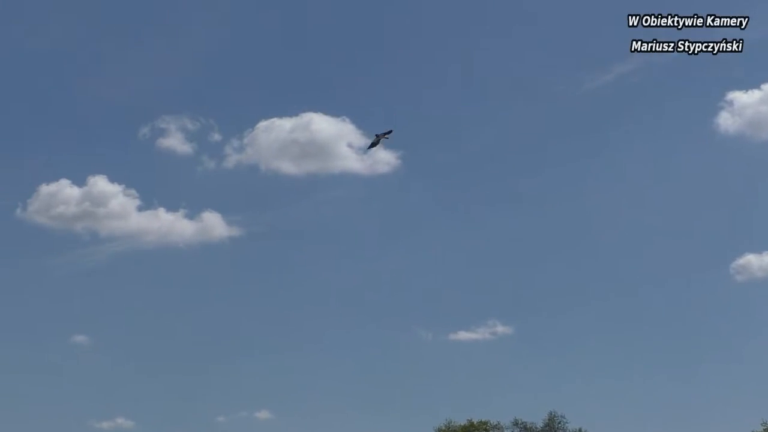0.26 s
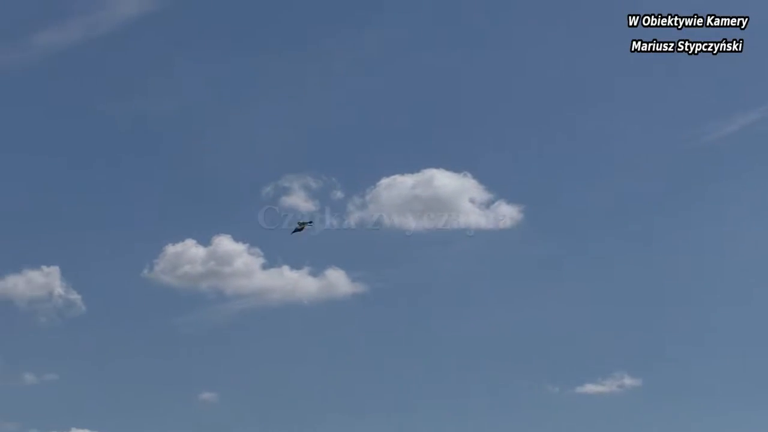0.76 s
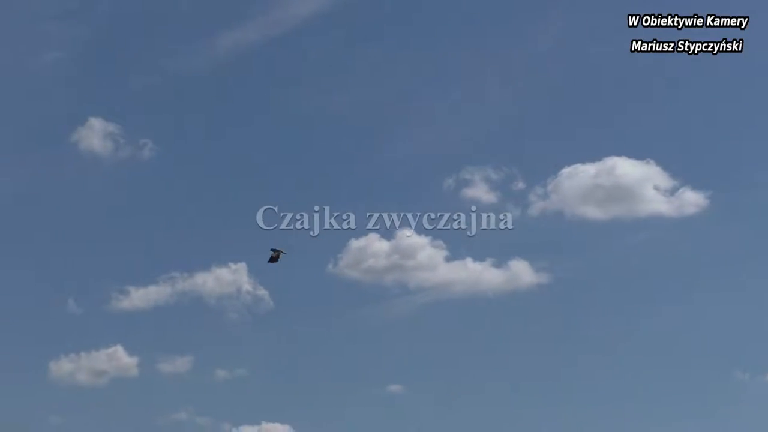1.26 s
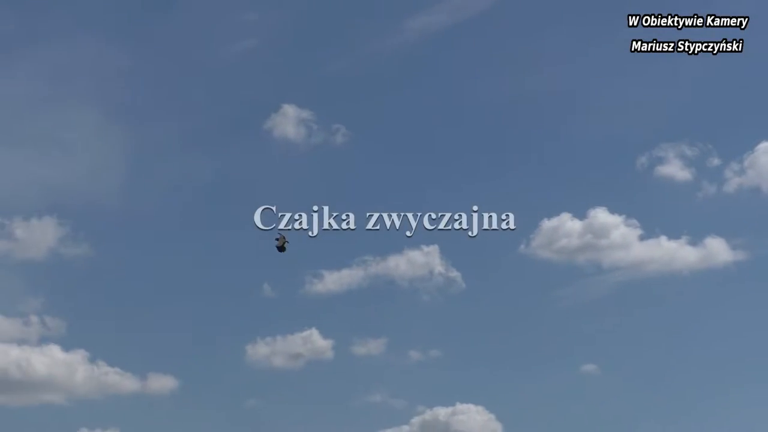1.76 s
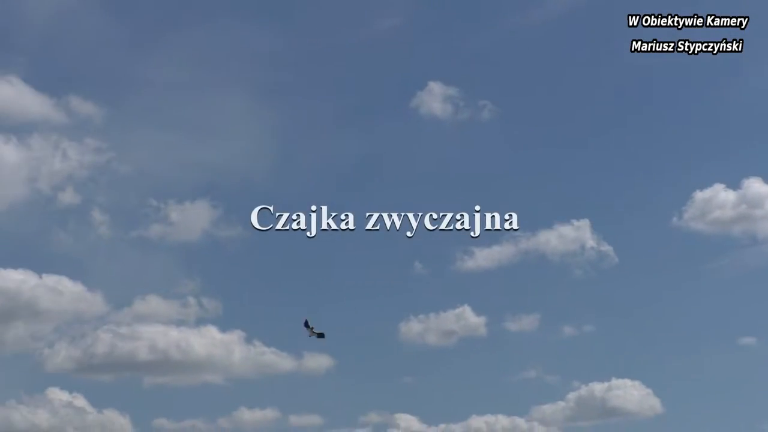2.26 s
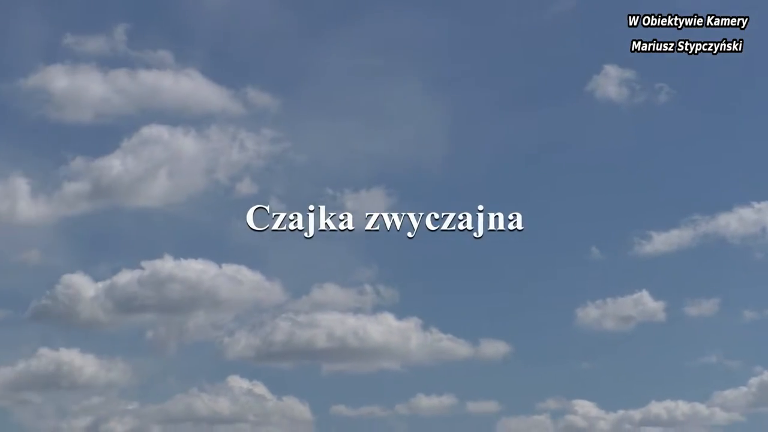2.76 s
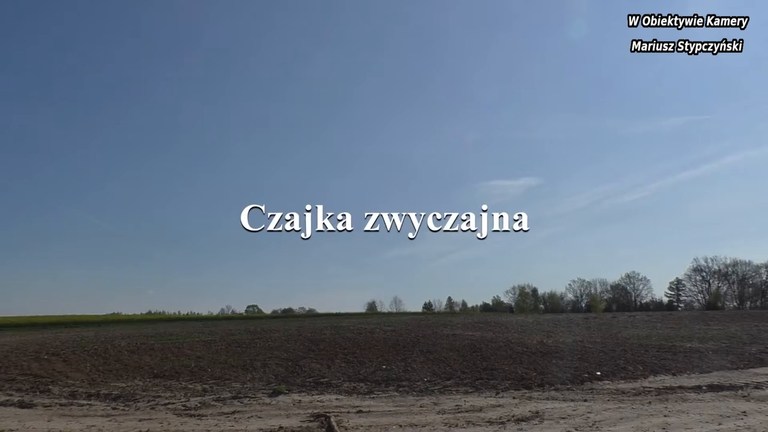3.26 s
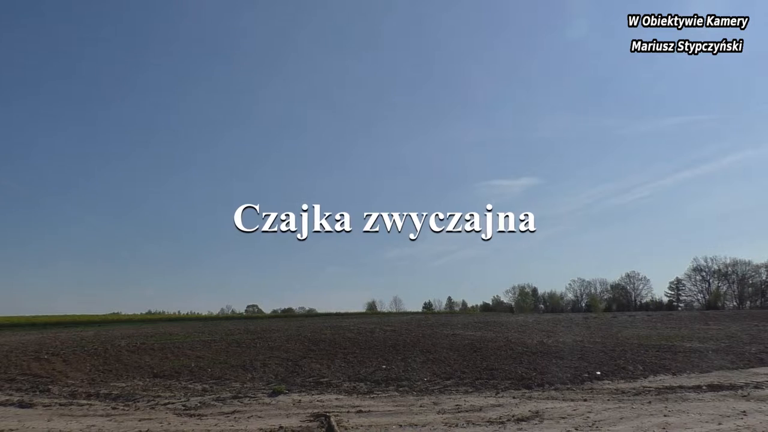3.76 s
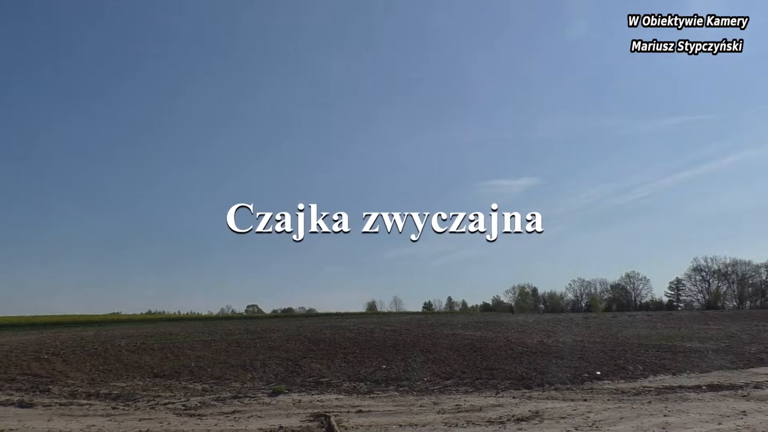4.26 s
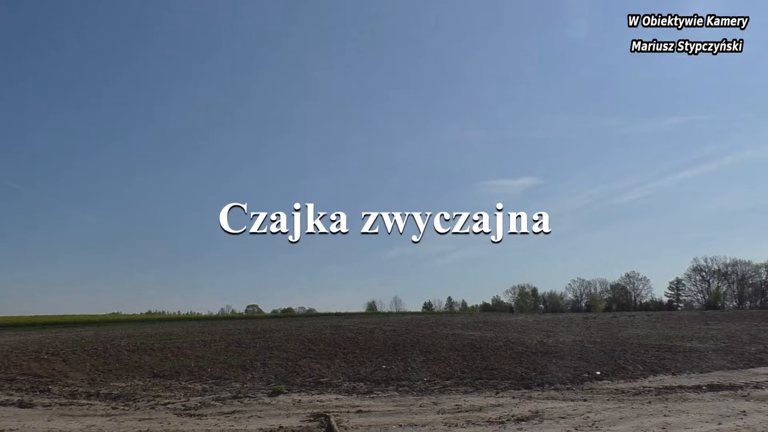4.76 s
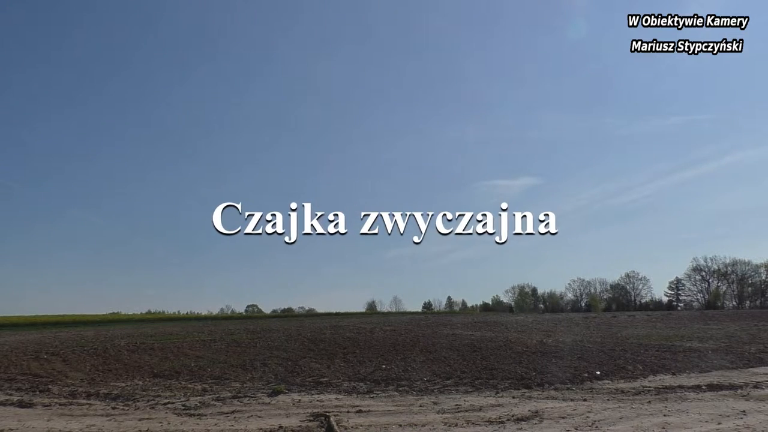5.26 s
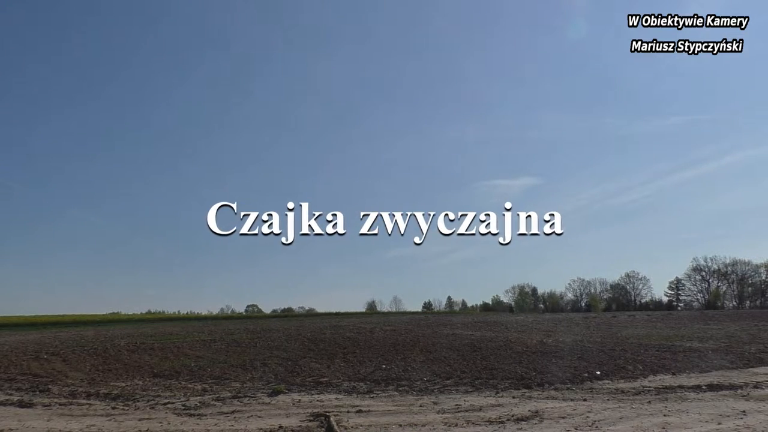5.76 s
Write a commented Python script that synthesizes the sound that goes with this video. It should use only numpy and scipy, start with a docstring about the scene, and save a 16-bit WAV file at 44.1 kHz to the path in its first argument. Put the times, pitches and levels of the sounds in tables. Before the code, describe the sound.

Outdoors over farmland, a hand-held camera microphone catches a reedy lapwing: a rising whine, two quick yelps with rasping mutters, then a hoarse dip sweeping up to a squeal. Distant thin whistles and a quick high trill come behind. After a gap, two nasal arched cries rise, crack slightly and fall. Soft crop hiss swells later; low wind thumps and a few finger knocks intrude.

```python
"""A lapwing opens with a reedy rising call over breezy fields, then yelps, mutters and slides hoarsely.
Far whistles glide in from 0.6 s and a trill turns five times at 2.7 s; arched calls follow at 3.8 and 5.5 s.
The calls are stacks of partials shaped by a throat, with rough spells and breath noise, and leave a faint echo.
Filtered noise buffets the ports in gusts and hisses in the crops, swelling after 4 s.
Now and then fingers tick and knock on the hand-held camera: short scrapes that ring its body modes."""
import sys
import numpy as np
from scipy import signal
from scipy.fft import rfft, irfft
from scipy.io import wavfile
from scipy.ndimage import uniform_filter1d, map_coordinates

SR = 44100
rng = np.random.default_rng(int(sys.argv[2]) if len(sys.argv) > 2 else 0)


def store_pcm(level_fs):
    """Save levels as 16-bit WAV."""
    pcm = np.round(np.clip(level_fs, -1, 1) * 32767).astype(np.int16)
    wavfile.write(sys.argv[1], SR, np.atleast_2d(pcm).T)


N = 265482
T = np.arange(N) / SR
TOP_HZ = 15850  # top of the camera's band


def undb(db):
    """Gain of a level in dB."""
    return 10 ** (np.asarray(db, float) / 20)


def curve(rows):
    """Automation lanes: the columns of (time_s, value, ..) rows drawn at every sample."""
    time_s, *columns = np.transpose(rows)
    return [np.interp(T, time_s, column) for column in columns]


def tilt(points, hz):
    """Level in dB at hz, read from (hz, db) points on a log frequency axis."""
    point_hz, db = np.transpose(points)
    return np.interp(np.log(np.maximum(hz, 1)), np.log(point_hz), db)


def walk(rate, count=N):
    """Smooth random wander of spread 1; a higher rate in Hz wanders faster."""
    width = max(int(SR / rate), 2)
    wander = uniform_filter1d(rng.standard_normal(count), width)
    wander = uniform_filter1d(wander, width)
    return wander / wander.std()


def pan(x, db):
    """Place a sound between the channels; db is left minus right."""
    return x * undb(np.array([db, -db]) / 2).reshape(2, -1)


def swells(rows, rise, fall):
    """Sum of (start_s, end_s, height) plateaus with sloped ends in s; fall may differ per row."""
    total = 0
    for (start, end, height), fall_s in zip(rows, np.broadcast_to(fall, len(rows))):
        slopes = np.minimum((T - start) / rise, (end - T) / fall_s)
        total = total + height * np.clip(slopes, 0, 1)
    return total


def gate(spans, edge_s):
    """1 inside the (start_s, end_s) spans, with soft edges."""
    is_on = sum(1. * (T >= start) * (T < end) for start, end in spans)
    return uniform_filter1d(is_on, int(edge_s * SR), mode="nearest")


def breathy(points):
    """Mono noise with the spectrum of (hz, db) points, rms 1."""
    hz = np.fft.rfftfreq(N, 1 / SR)
    inside = (hz > points[0][0]) * (hz < points[-1][0])
    noise = irfft(rfft(rng.standard_normal(N)) * undb(tilt(points, hz)) * inside, N)
    return noise / noise.std()


def air(points, alike, lo_hz, hi_hz, flicker_db, rate):
    """Stereo noise, rms 1 from lo to hi before each octave flickers by itself; alike 1 is mono, 0 unrelated."""
    hz, out = np.fft.rfftfreq(N, 1 / SR), 0
    mid, side = rfft(rng.standard_normal((2, N))) * undb(tilt(points, hz)) * (hz > points[0][0])
    pair = np.sqrt(1 + alike) * mid + np.sqrt(1 - alike) * side * np.array([[1], [-1]])
    in_band = (hz > lo_hz) & (hz < hi_hz)
    pair = pair * N / np.sqrt(2 * (1 + alike) * np.sum(np.abs(mid[in_band]) ** 2))
    for octave in range(int(np.log2(points[0][0])), int(np.log2(points[-1][0])) + 2):
        share = np.clip(1 - np.abs(np.log2(hz + 1) - octave), 0, 1)  # triangular octave bands
        out = out + irfft(pair * share, N) * undb(flicker_db * walk(rate))
    return out


def far_drone():
    """A far drone: a narrow, nearly mono noise band around one pitch, steady until 3.1 s and much fainter
    after."""
    # drone level: time_s, level_db
    drone_level = [(3.1, -73.5), (3.2, -82)]
    centre_hz, reach_hz = 756, 132
    skirt = [(centre_hz - reach_hz, -20), (centre_hz, 0), (centre_hz + reach_hz, -40)]
    return undb(curve(drone_level)[0]) * air(skirt, 0.99, 500, 1000, 1.0, 0.47)


def microphone_hiss():
    """Microphone self-noise: steady mono hiss at the top of the band."""
    # hiss spectrum: freq_hz, density_db (per Hz)
    hiss = [(5000, -39), (8500, -4), (11000, 4.5), (14000, 2), (16000, 3.5)]
    return undb(-82) * air(hiss, 1.0, 14550, 15110, 0.56, 4.1)


def crops():
    """The breeze rubs through the crops: broad hiss, partly shared by both channels."""
    # crop spectrum: freq_hz, density_db (per Hz)
    crop_spectrum = [(400, 1.5), (600, -6), (1000, 3), (1500, 3), (2800, 0), (3800, -4.5), (5000, -11.5),
                     (8000, -12), (12000, -27.5)]
    # breeze in the crops: time_s, level_db
    breeze = [(0, -64), (3.1, -65), (4.2, -58), (4.3, -54), (4.4, -60), (4.62, -59.5), (4.72, -56),
              (5.04, -58.5), (5.12, -68.5), (6.0, -68.5)]
    return undb(curve(breeze)[0]) * air(crop_spectrum, 0.61, 580, 7900, 1.5, 6.6)


def wind():
    """Turbulence at the ports: gusty buffeting unrelated left to right, low rumble and single puffs."""
    # gusts on the ports: start_s, length_s, level_db
    gust_rows = [(1.79, 0.36, -58), (3.122, 0.46, -60), (3.629, 0.24, -61), (3.905, 0.5, -68.5),
                 (4.245, 0.18, -66), (4.531, 0.3, -60), (4.809, 0.19, -56.5), (5.213, 0.87, -57)]
    # buffeting spectrum: freq_hz, density_db (per Hz)
    buffet = [(25, -4.5), (97, 2.5), (172, -4.5), (309, -15), (600, -38)]
    # steady far rumble: freq_hz, density_db (per Hz)
    rumble = [(25, -3.5), (150, 0), (350, -3), (600, -17.5)]
    # puffs that swing the diaphragm once: start_s, level_db, swing_hz
    puffs = [(1.901, -41, 95), (1.942, -43, 102), (1.963, -28.5, 130)]
    spans = [(start, start + length, undb(db)) for start, length, db in gust_rows]
    fall_s = 0.61 * np.array(gust_rows)[:, 1]  # longer gusts die away longer
    gusts = swells(spans, 0.034, fall_s)
    out = gusts * air(buffet, 0, 33, 330, 4.4, 20.6)
    out += undb(-70.5) * air(rumble, 0.08, 30, 380, 2.95, 4.4)
    for start, db, swing_hz in puffs:
        u = np.clip((T - start) * swing_hz, 0, 1)
        out += pan(undb(db) * np.sin(np.pi * u) * np.sin(2 * np.pi * u), 5.2)
    return out


def handling():
    """Each contact scrapes for a few ms and rings the plastic body; nails bring out its treble, pads its bass."""
    # finger contacts: start_s, blow_db, bass_db, treble_db, contact_s (decay), pan_db (left minus right)
    knocks = [(0.3942, -17, -2.5, -13, 0.0064, -5.5), (0.516, -58.5, 5.5, 8, 0.0021, -5),
              (1.798, -31, -8, -7, 0.015, 1.5), (2.031, -52, 7, -15, 0.0026, -4),
              (2.6381, -42.5, -8.5, 27, 0.0012, 3), (4.012, -49.5, 0, -1, 0.0034, -4),
              (4.354, -49.5, -22, -12, 0.0021, -3)]
    # modes of the camera body: freq_hz, level_db, t60_s
    body = [(321, -6.5, 0.076), (380, 4.5, 0.066), (663.5, -8.5, 0.027), (1080, -18, 0.046),
            (1380, 4, 0.0074), (2010, 10.5, 0.0059), (3110, -6.5, 0.016), (5266, 0, 0.0076),
            (6200, 9.5, 0.0022), (10070, 12, 0.0024), (8180, 6.5, 0.0032), (13700, 9.5, 0.0024)]
    bass_hz, treble_hz = 600, 4500  # modes below and above these take the bass and treble settings
    port_lag_rad = 2.05  # the low modes reach the two ports out of step
    shell_hz = 67  # the knocks are cut below this
    out, t = np.zeros((2, N)), T[:int(.12 * SR)]
    lag = port_lag_rad / 2 * np.array([[1], [-1]])
    for start, blow_db, bass_db, treble_db, contact_s, pan_db in knocks:
        ring = 0
        for hz, mode_db, t60 in body:
            gain = undb(mode_db + bass_db * (hz < bass_hz) + treble_db * (hz > treble_hz))
            onset = np.minimum(t * hz / 2 + (hz < treble_hz), 1) ** 2  # treble modes build over two cycles
            swing = np.sin(2 * np.pi * hz * t + lag * (hz < bass_hz))
            ring = ring + gain * swing * 1000. ** (-t / t60) * onset
        scrape = rng.standard_normal(len(t)) * np.exp(-(t / contact_s) ** 0.94)
        scrape /= np.sqrt(contact_s * SR)  # even out the energy of long and short contacts
        knock = signal.fftconvolve(scrape[None], ring, axes=1)[:, :len(t)]
        at = int(start * SR)
        out[:, at:at + len(t)] += pan(undb(blow_db) * knock, pan_db)
    return signal.lfilter(*signal.butter(2, shell_hz, "high", fs=SR), out)


def far_birds():
    """Nearly pure gliding notes wavering on their long path; the trill sits to the right."""
    # far whistles: start_s, length_s, start_hz, middle_hz, end_hz, level_db
    whistles = [(0.577, 0.018, 4220, 3500, 2300, -59), (0.799, 0.12, 2434, 2307, 2280, -58),
                (0.962, 0.067, 1920, 2093, 2099, -51), (1.108, 0.075, 1930, 2200, 1930, -47),
                (1.674, 0.027, 3455, 3700, 3490, -57.5), (1.708, 0.071, 3210, 3330, 3660, -60),
                (5.368, 0.12, 4530, 4540, 4520, -75.5)]
    # one turn of the trill, a falling and a rising note: delay_s, length_s, start_hz, middle_hz, end_hz, level_db
    trill_notes = [(0, 0.03, 6000, 6140, 5650, -7), (0.027, 0.038, 4720, 5180, 5280, 1)]
    trill_s, period_s, trill_db = 2.705, 0.0945, -51.5
    notes = [(*note, 0) for note in whistles]
    for turn in range(5):
        turn_db = trill_db - 18 * 0.54 ** turn  # starts shy and warms towards full level
        for delay, *note, rel_db in trill_notes:
            notes.append((trill_s + turn * period_s + delay, *note, turn_db + rel_db, -4.0))
    out = np.zeros((2, N))
    for start, length, start_hz, middle_hz, end_hz, db, pan_db in notes:
        u = np.arange(int(length * SR)) / (length * SR)
        glide = np.polyfit([0, .5, 1], [start_hz, middle_hz, end_hz], 2)
        phase = 2 * np.pi * np.cumsum(np.polyval(glide, u)) / SR
        note = undb(db) * np.sin(np.pi * u ** 0.65) * np.sin(phase)
        at = int(start * SR)
        out[:, at:at + len(u)] += pan(note, pan_db)
    return out * undb(3.5 * walk(350))


def yelps():
    """Yelps: the pitch eases up to a plateau, creeps on, then dives and rebounds as overtones fade."""
    # yelps: start_s, low_hz, climb_from_s, climb_to_s, top_hz, dive_s, level_db (at a pitch of 1 kHz),
    # onset_overtones_db
    yelp_rows = [(0.728, 737.5, 0.75, 0.818, 1835, 0.878, -57.5, -1.5),
                 (1.233, 1616, 1.244, 1.27, 1844, 1.312, -58.5, -18)]
    # the dive and rebound: after_dive_s, pitch_hz
    dive_rows = [(0.02, 1158), (0.037, 770.6), (0.054, 915), (0.075, 1380), (0.085, 1495)]
    out, u = [], np.linspace(0, 1, num=9)
    for start, low_hz, climb_from, climb_to, top_hz, dive, db, onset_db in yelp_rows:
        climb_hz = low_hz + (top_hz - low_hz) * np.sin(np.pi / 2 * u) ** 2
        path = list(zip(climb_from + (climb_to - climb_from) * u, climb_hz))
        path.append((dive, top_hz * 1.025))
        path += [(dive + delay, hz) for delay, hz in dive_rows]
        body = [(at, hz, db, 0) for at, hz in path[:-1]]
        out.append([(start, low_hz, db, onset_db), *body, (*path[-1], db, -19)])
    return out


def arched_calls():
    """Arched calls: one contour set twice; the voice breaks lower at once and mends."""
    # the arch: time_s, pitch_hz, level_db, overtones_db (they choke late on)
    arch = [(0, 1037, -9.5, 0), (0.03, 1304, -2, 2), (0.06, 1464, 2, 0.5), (0.11, 1580, 0, 1.5),
            (0.19, 1522, 0, 0.5), (0.269, 1429, 0, -5.5), (0.315, 1480, -6, -3.5), (0.34, 1488, -5.5, -18),
            (0.38, 1410, -9, -14), (0.405, 1263, -2.5, 1), (0.45, 1075, -3, -1.5), (0.499, 861, 3, -12)]
    # arched calls: start_s, break_s, end_s, level_db (at a pitch of 1 kHz)
    arch_rows = [(3.847, 4.059, 4.29, -64), (5.516, 5.711, 6.02, -62)]
    break_drop, mend_s = 0.025, 0.04  # share of the pitch lost, time constant of regaining it
    out = []
    arch_s, *columns = np.transpose(arch)
    for start, break_s, end, db in arch_rows:
        t = np.linspace(start, end, num=120)
        hz, rel_db, over_db = (np.interp(t - start, arch_s, column) for column in columns)
        lost = break_drop * (t > break_s) * np.exp(-np.abs(t - break_s) / mend_s)
        out.append(list(zip(t, hz * (1 - lost), db + rel_db, over_db)))
    return out


def phrases():
    """Every near call as rows of (time_s, pitch_hz, level_db, overtones_db), in order of time."""
    # other near calls, phrase by phrase: time_s, pitch_hz, level_db (at a pitch of 1 kHz)
    near_calls = [
        [(0, 784, -63.5), (0.035, 783, -53.5), (0.125, 815, -52.5), (0.15, 890, -51.5), (0.18, 1210, -59),
         (0.2, 1306, -51.5), (0.295, 1382, -54.5), (0.33, 1441, -52.5), (0.39, 1770, -60.5), (0.415, 1614, -68)],
        [(0.61, 1500, -78.5), (0.66, 1483, -84)],
        [(0.665, 756, -59), (0.685, 724, -60), (0.704, 768, -57)],
        [(0.965, 959, -80), (1.12, 984, -74.5), (1.235, 1050, -72)],
        [(1.87, 900, -84), (1.92, 1057, -69), (1.97, 1197, -71), (2.2, 1144, -67.5), (2.26, 1038, -63.5),
         (2.3, 953, -56), (2.35, 930.4, -54), (2.4, 939, -56.5), (2.43, 1113, -58.5), (2.46, 1508, -55.5),
         (2.48, 1820, -71.5), (2.5, 1780, -62), (2.56, 1732, -61.5), (2.6, 1820, -64.5), (2.635, 1761, -60.5),
         (2.655, 1458, -77.5)],
    ]
    plain = [[(*row, 0) for row in call] for call in near_calls]
    return sorted(plain + yelps() + arched_calls())


def second_membrane(shake):
    """The second membrane slips off pitch in hoarse passages: a sine and its octave, shaken with the first."""
    # slips of the second membrane: time_s, pitch_hz, level_db
    slips = [
        [(1.11, 1580, -60), (1.18, 1670, -50.5), (1.25, 1628, -38.5)],
        [(1.88, 950, -61), (1.94, 1150, -60), (1.99, 1457, -62), (2.2, 1205, -53.5), (2.29, 983, -53.5)],
    ]
    out = np.zeros(N)
    for slip in slips:
        hz, db = curve(slip)
        turn = 2 * np.pi * np.cumsum(hz) / SR + 1.6 * shake
        tone = np.sin(turn) + 0.34 * np.sin(2 * turn)
        out += undb(db + 2.5 * walk(69)) * tone * gate([(slip[0][0], slip[-1][0])], 0.01)
    return out


def lapwing():
    """Partials of a reed-like membrane through the throat; hoarseness shakes period and size and lets breath rasp."""
    # hoarse spells: start_s, end_s, roughness (0-1), breath (0-1)
    hoarse = np.array([(-.05, .05, .2, .3), (.59, .67, .8, 1), (.66, .78, .12, .1), (.88, .98, .06, 0),
                       (.963, 1.24, .3, .9), (1.19, 1.27, .1, 0), (1.31, 1.42, .07, 0),
                       (1.84, 2.3, .17, .3), (1.96, 2.31, .04, .7), (4.05, 4.22, .25, .1),
                       (4.2, 4.33, .16, .05), (5.49, 5.58, .17, .2), (5.75, 5.91, .26, .15),
                       (5.89, 6.07, .15, .05)])
    # overtones sagging below the fundamental: start_s, end_s, sag (share of the pitch)
    sags = [(4.08, 4.21, .08), (5.78, 5.9, .08)]
    # radiation of the fundamental, weak at low pitch: pitch_hz, level_db
    first = [(780, -1.5), (940, -13), (1150, 7.5), (1300, 5.5)]
    # strength of the partials: number, level_db (relative to the third)
    partials = [(2, -6), (4, -7.5), (5, -1.5), (6, -5), (7, -9.5), (9, -12), (13, -1.5), (16, -13)]
    # throat resonances: freq_hz, level_db
    throat = [(1500, 11), (2400, 4.5), (3400, 10.5), (3950, 11.5), (4450, 6.5), (5200, 0.5), (6300, -9.5),
              (7500, -10.5), (10000, -3), (13000, -1), (16000, -39)]
    # breath ringing in the throat: freq_hz, density_db (per Hz)
    husk = [(2200, -22), (2900, 0.5), (3400, -15), (4000, 0.5), (4600, -35)]
    # breath torn by a hoarse throat: freq_hz, density_db (per Hz)
    rasp_spectrum = [(4000, -14), (5500, -31), (7600, 8), (8600, -6), (10200, 5), (12000, -17)]
    # position of the caller: time_s, pan_db (left minus right)
    bearing = [(0, 0.5), (1.3, -0.5), (2.6, 1), (3.8, -5), (6.0, -5)]
    # delays of the ground bounce, a little later at the right port: left_s, right_s
    bounce_s = (0.0031, 0.0033)
    clear, edge_s = .03, .045  # roughness of the clear voice, onset of a hoarse spell
    effort_db_per_octave = 13  # higher notes are pushed harder
    shimmer_db = 2.

    calls = phrases()
    lanes = curve([row for call in calls for row in call])
    hz, level_db, over_db = (uniform_filter1d(lane, int(0.0083 * SR)) for lane in lanes)
    level_db = level_db + effort_db_per_octave * np.log2(hz / 1000)
    over_level_db = level_db + over_db
    rough = np.clip(clear + swells(hoarse[:, [0, 1, 2]], edge_s, edge_s), 0, 1)
    breath = np.clip(swells(hoarse[:, [0, 1, 3]], edge_s, 2 * edge_s), 0, 1)

    phase = 2 * np.pi * np.cumsum(hz * (1 + 0.00382 * walk(49.2))) / SR
    upper = phase - 2 * np.pi * np.cumsum(hz * swells(sags, .07, .03)) / SR
    shake = rough * 1.17 * walk(575)
    first_db = level_db + tilt(first, hz) - 10.0 * breath + shimmer_db / 2 * walk(58)
    voice = undb(first_db) * np.sin(phase + 1.5 * shake)

    number, rel_db = np.transpose(sorted(partials + [(3, 0.037)]))
    even_db = 11 * np.log2(hz / 2000)  # even partials thin out as the pitch falls
    even_db += 9.0 * np.clip((rough - clear) * 10, 0, 1)  # a hoarse membrane swings lopsided
    for k in range(2, 17):
        db = over_level_db + np.interp(k, number, rel_db) + (k % 2 == 0) * even_db
        db += tilt(throat, k * hz) + shimmer_db * walk(76) - 14.8 * rough
        size = 1 + 3.45 * rough * walk(880)
        voice += undb(db) * size * np.sin(k * (upper + shake) + k * k) * (k * hz < TOP_HZ)

    voice += rough * undb(over_level_db + 11.0 + shimmer_db * walk(150)) * breathy(husk)
    read_speed = 1 - .22 * (1 - breath)  # the rasp climbs as the breath builds
    rasp = map_coordinates(breathy(rasp_spectrum), [np.cumsum(read_speed)])
    puffing = 1 + .5 * np.cos(phase + shake)  # a puff each cycle
    voice += undb(over_level_db + 4.5 + shimmer_db * walk(250)) * (clear + breath) * rasp * puffing
    voice *= gate([(call[0][0], call[-1][0]) for call in calls], 0.00084)

    voice += second_membrane(shake)
    bounce = np.array([np.interp(T - delay, T, voice) for delay in bounce_s])  # off the ground
    return pan(np.sqrt(2) * (voice + undb(-6) * bounce), curve(bearing)[0])


def tree_line(birds):
    """Scattered return from the tree line: decaying noise as an echo, its treble swallowed by the air."""
    t60_s, onset_s = 2.05, 0.0014
    t = T[:int(1.2 * SR)]
    tail = rng.standard_normal((2, len(t))) * 1000. ** (-t / t60_s) * np.minimum(t / onset_s, 1)
    tail /= np.sqrt(np.sum(tail ** 2) / 2)
    tail = signal.lfilter(*signal.butter(2, 4500, fs=SR), tail)
    return undb(-16) * signal.fftconvolve(birds, tail, axes=1)[:, :N]


def scene():
    """Birds and their echo over wind, crops, drone, hiss and handling."""
    background = far_drone() + microphone_hiss() + crops() + wind()
    birds = far_birds() + lapwing()
    return background + handling() + birds + tree_line(birds)


def record(dry):
    """The camera cuts the top with a steep low-pass."""
    return signal.sosfilt(signal.ellip(10, .2, 80, TOP_HZ, fs=SR, output="sos"), dry)


dry = scene()
out = record(dry)
store_pcm(out)
```